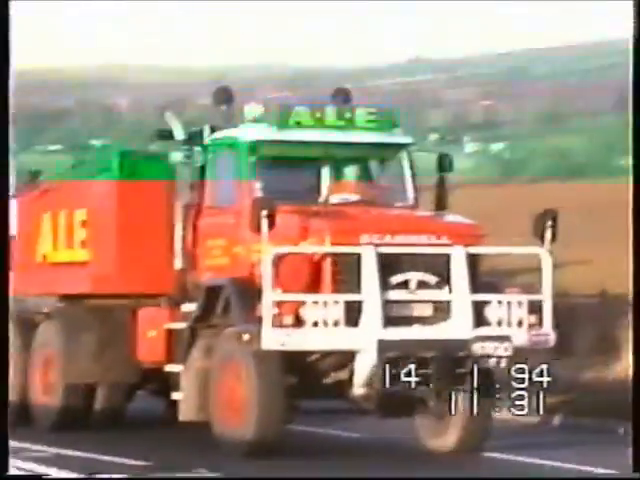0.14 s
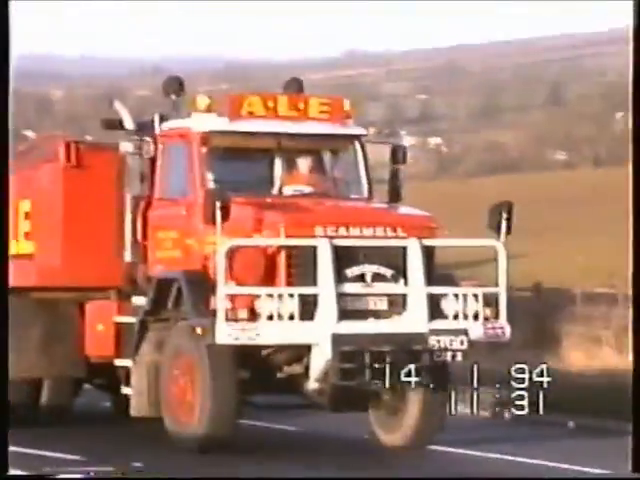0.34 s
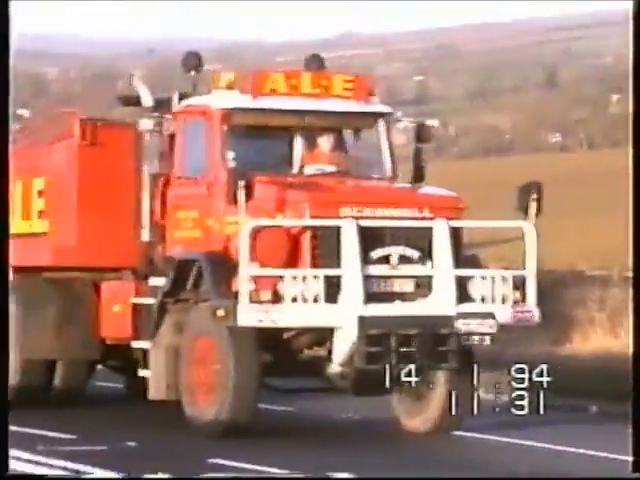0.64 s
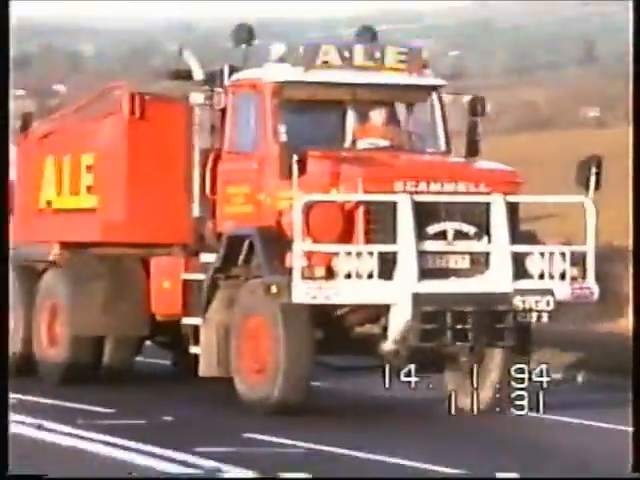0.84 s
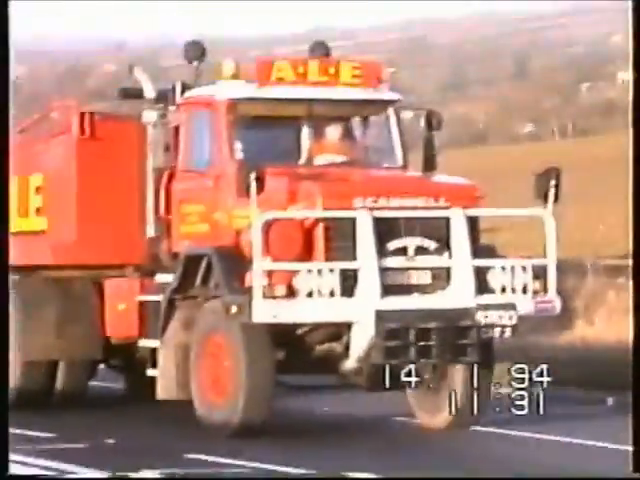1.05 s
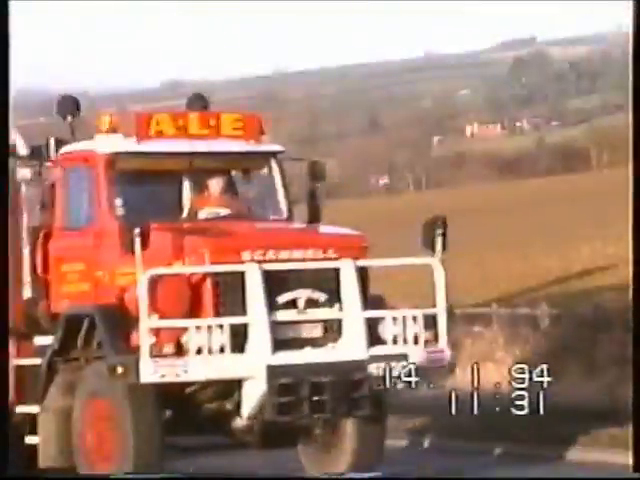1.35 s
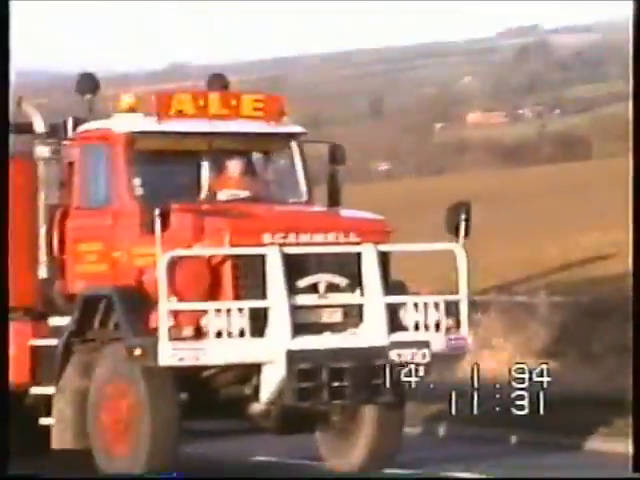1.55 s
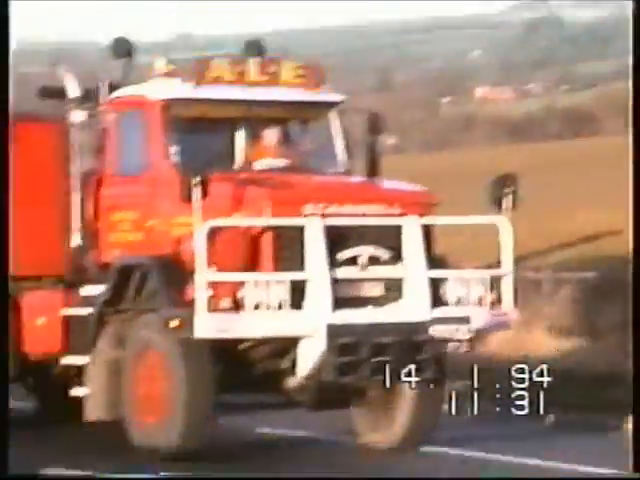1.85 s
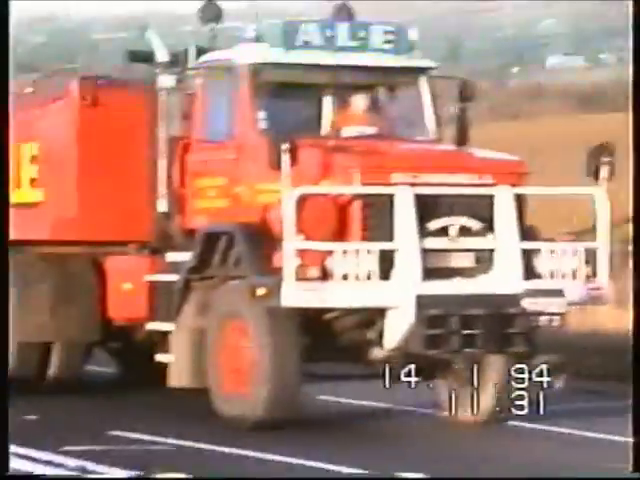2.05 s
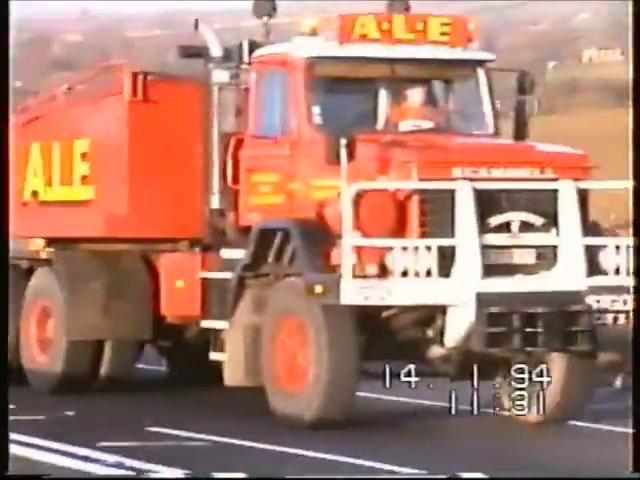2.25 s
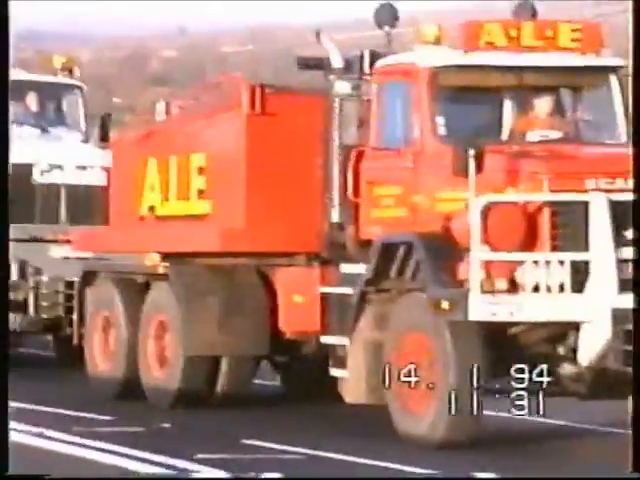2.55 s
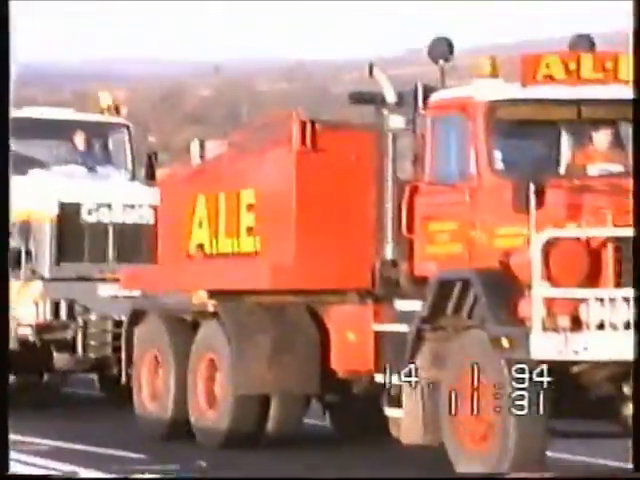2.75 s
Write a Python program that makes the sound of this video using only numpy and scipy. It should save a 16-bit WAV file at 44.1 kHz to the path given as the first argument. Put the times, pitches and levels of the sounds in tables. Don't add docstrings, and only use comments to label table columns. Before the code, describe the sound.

Two heavy diesel trucks roar steadily along an open country road, engines surging slightly under load; low wind gusts thump the microphone, faint metallic rattles tick above, and old mono tape adds hiss.

```python
import sys
import numpy as np
from scipy import signal
from scipy.fft import rfft, irfft
from scipy.io import wavfile
from scipy.ndimage import uniform_filter1d

SR = 44100
rng = np.random.default_rng(int(sys.argv[2]) if len(sys.argv) > 2 else 0)


def volts_from_db(level):
    exponent = np.asarray(level, float) / 20
    return 10 ** exponent


def output_pcm(signal):
    pcm = np.clip(np.atleast_2d(signal).T, -1, 1) * 32767
    wavfile.write(sys.argv[1], SR, np.round(pcm).astype(np.int16))


N = 128331


def level(x, db):
    return x * volts_from_db(db) / np.sqrt(np.mean(x ** 2))


def curve(table, column):
    points = np.array(table)
    return np.interp(np.arange(N) / SR, points[:, 0], points[:, column])


def walk(rate):
    hold = int(SR / rate)
    steps = np.repeat(rng.standard_normal(N // hold + 1), hold)
    return 1.3 * uniform_filter1d(uniform_filter1d(steps, hold), hold)[:N]


def bands(x, colour, gain_db):
    hz = np.maximum(np.arange(N // 2 + 1) * SR / N, 1)
    f, db = np.array(colour, float).T
    spectrum = rfft(x) * volts_from_db(np.interp(np.log(hz), np.log(f), db, left=-99, right=-99))
    place = 2 * np.log2(hz)
    out = 0
    for k in range(int(2 * np.log2(f[0])), int(2 * np.log2(f[-1])) + 2):
        crossfade = np.cos(np.pi / 2 * np.clip(place - k, -1, 1)) ** 2
        out = out + volts_from_db(gain_db(2 ** (k / 2))) * irfft(spectrum * crossfade, N)
    return level(out, 0)


def ring(hz, share):
    edges = [hz * (1 - share), hz * (1 + share)]
    resonance = signal.butter(3, edges, "band", fs=SR, output="sos")
    return level(signal.sosfilt(resonance, rng.standard_normal(N)), 0)


def swell(at, db, length, sound):
    bell = np.exp(-((np.arange(N) / SR - at) / length) ** 2)
    return volts_from_db(db) * bell * sound * np.sqrt(np.sum(bell ** 2) / np.sum((bell * sound) ** 2))


def drifting(hz, width):
    lowpass = signal.butter(2, width / 2, fs=SR, output="sos")
    slow = signal.sosfilt(lowpass, rng.standard_normal((2, N)))
    turn = 2 * np.pi * np.cumsum(hz * (1 + .03 * walk(5))) / SR
    return level(slow[0] * np.cos(turn) + slow[1] * np.sin(turn), 0)


def engine(firing_hz, orders, scatter_db):
    phase = np.cumsum(firing_hz * (1 + .006 * walk(3))) / SR
    tone = 0
    for order, db in orders:
        uneven = np.sqrt(2) * volts_from_db(db + scatter_db * walk(11))
        tone = tone + uneven * np.sin(2 * np.pi * (order * phase + rng.random()))
    return tone, phase % 1


# [multiple of the firing rate, level/dB rms]
LEAD_ORDERS = [(1, -41), (2, -31), (7, -45)]
# [t/s, level/dB]
LEAD_PULL = [(0, 5), (.07, 0), (.25, 6.5), (.32, -0.5), (.38, 3), (.58, -3), (.68, 2.5), (.9, 3.5),
             (1.1, -2.5), (1.45, -1.5), (1.68, 3.5), (1.85, -3.5), (2.0, 0.5), (2.18, -5.5), (2.4, 2.5),
             (2.55, -2.5), (2.91, 1)]


def lead_engine():
    tone, phase = engine(84.1, LEAD_ORDERS, scatter_db=1.1)
    return volts_from_db(curve(LEAD_PULL, column=1)) * tone, phase


# [multiple of the firing rate, level/dB rms]
REAR_ORDERS = [(2, -40), (3, -40), (4, -40), (6, -42), (7, -43)]


def rear_engine():
    return engine(106.7, REAR_ORDERS, scatter_db=3.5)


# [t/s, level/dB, brightness/dB]
CONVOY = [(0, -22.5, -2.5), (.35, -25, -1.5), (.6, -27.5, 0.5), (.9, -26.5, 3), (1.15, -25, -2.5),
          (1.4, -25.5, 1), (1.7, -26, 0), (2.0, -25, -.5), (2.3, -26.5, 3), (2.55, -26, 2.5),
          (2.91, -27, 4.5)]
# [f/Hz, level/dB per Hz]
ROAR = [(30, -27), (85, -3), (200, 1.5), (700, -5.5), (1600, -13), (2300, -21), (3000, -27.5), (3900, -35)]
# [f/Hz, width/Hz, level/dB rms]
PANELS = [(1432, 40, -43), (3050, 70, -57), (2150, 247, -43), (3850, 130, -70), (871.6, 187, -39.5),
          (644, 58, -40.5), (1183, 60, -45.5), (1707, 70, -48), (2596, 220, -54.5)]


def roar(lead_phase, rear_phase):
    puffs = 1 + .3 * np.exp(-lead_phase / .3) + .4 * np.exp(-rear_phase / .3)
    load, bright = curve(CONVOY, column=1), curve(CONVOY, column=2)
    shared = walk(18)

    def gain_db(hz):
        treble = np.clip(np.log2(hz / 473.0), 0, 1)
        return treble * (bright + 1.2 * shared + 0.92 * walk(18)) + 0.57 * walk(12)

    panels = sum(volts_from_db(db + bright + 2.5 * walk(12)) * drifting(hz, width) for hz, width, db in PANELS)
    rush = bands(puffs * rng.standard_normal(N), ROAR + [(4400, -50.5)], gain_db)
    top = signal.butter(8, 3970, fs=SR, output="sos")
    return panels + volts_from_db(load + 5.5) * signal.sosfilt(top, rush)


# [t/s, level/dB, length/s, f/Hz]
GUSTS = [(0.103, -23, 0.044, 240), (0.214, -22.5, 0.04, 231), (0.355, -25.5, 0.035, 290),
         (0.543, -26, 0.034, 240), (1.123, -19, 0.055, 352), (1.172, -26, .06, 234),
         (1.261, -22, 0.075, 344), (1.158, -26, 0.089, 500), (1.493, -23, 0.061, 230),
         (1.65, -24.5, 0.055, 228.3), (1.858, -25, 0.08, 349), (2.072, -25, 0.06, 268),
         (2.198, -25, .06, 238), (2.351, -27, 0.055, 206.2), (2.582, -25, 0.038, 397.5),
         (0.298, -31, 0.25, 596), (1.977, -31, 0.17, 744), (0.488, -30, .04, 714), (.93, -30, .06, 630),
         (1.6, -25.5, 0.063, 327), (2.16, -28, 0.053, 384)]


def wind():
    buffet = volts_from_db(2.1 * walk(30.1))
    return sum(swell(at, db, length, buffet * ring(hz, .28)) for at, db, length, hz in GUSTS)


# [f/Hz, level/dB per Hz]
RATTLE = [(4200, -11), (4900, -12), (5500, -3), (6050, 0), (6500, -5.5), (7200, -3), (8000, -14),
          (8600, -24)]
# [t/s, level/dB, f/Hz]
CHINKS = [(1.372, -57, 7000), (1.372, -57.5, 5700), (1.49, -63, 6000), (1.745, -59, 7000),
          (1.782, -60, 5800), (2.49, -61, 4400), (1.028, -59, 5800), (.33, -61.5, 6700), (2.407, -59, 5800),
          (2.715, -60, 5800), (2.675, -59.5, 7000)]


def rattle():
    shared = 0.26 * walk(5.9) + .9 * walk(16) + 1.5 * walk(39.97)
    ticks = rng.standard_normal(N) * volts_from_db(1.4 * rng.exponential(size=N))
    chatter = bands(ticks, RATTLE, lambda hz: shared + .7 * walk(10))
    chinks = sum(swell(at, db, .007, ring(hz, .14)) for at, db, hz in CHINKS)
    return volts_from_db(-59.5 + 0.67 * curve(CONVOY, column=2)) * chatter + chinks


# [f/Hz, level/dB per Hz]
HISS = [(3000, -3), (8700, -2.5), (9800, 0), (11000, -2), (12900, -6.5)]


def tape_hiss():
    bright = curve(CONVOY, column=2)
    hiss = bands(rng.standard_normal(N), HISS, lambda hz: 1.0 * walk(7) + .4 * bright)
    return volts_from_db(-62) * hiss


# [f/Hz, level/dB rms]
WHISTLES = [(8000, -90), (9000, -89), (10200, -88), (11400, -91), (12600, -93)]


def whistles():
    t = np.arange(N) / SR
    return sum(np.sqrt(2) * volts_from_db(db) * np.sin(2 * np.pi * hz * t) for hz, db in WHISTLES)


# [f/Hz, level/dB per Hz]
CHANNEL_NOISE = [(25, 2), (70, -4), (130, -15), (400, -10), (900, -14), (3000, -29), (6000, -30),
                 (12900, -40)]


def channel_noise():
    return volts_from_db(-67) * bands(rng.standard_normal(N), CHANNEL_NOISE, lambda hz: 0)


def scene():
    lead, lead_phase = lead_engine()
    rear, rear_phase = rear_engine()
    mono = lead + rear + roar(lead_phase, rear_phase) + wind() + rattle()
    return np.array([mono, mono])


def roll_off(x):
    return signal.sosfilt(signal.butter(12, 12890, fs=SR, output="sos"), x)


def record(dry):
    tape = np.tanh(1.506 * dry[0]) / 1.488 + tape_hiss() + whistles()
    lag = .93
    delay = np.exp(-2j * np.pi * np.arange(N // 2 + 1) / N * lag)
    late = irfft(rfft(tape) * delay, N)
    apart = channel_noise()
    offset = .1187
    return roll_off(np.array([late + apart, tape - apart]) + offset)


dry = scene()
out = record(dry)
output_pcm(out)
```